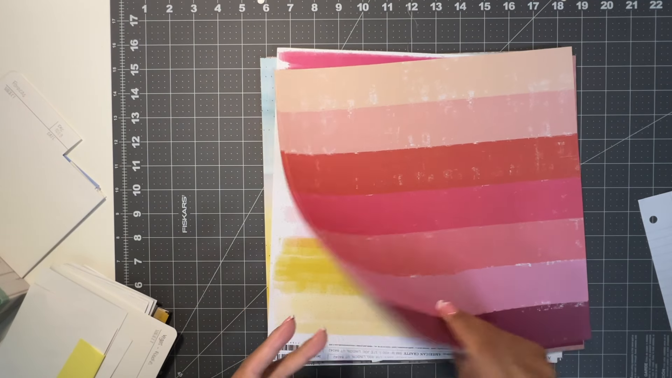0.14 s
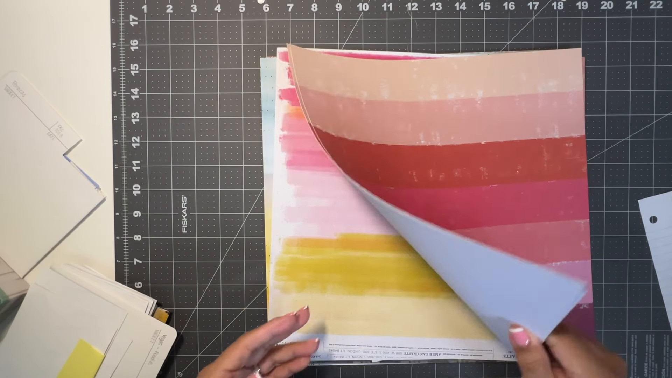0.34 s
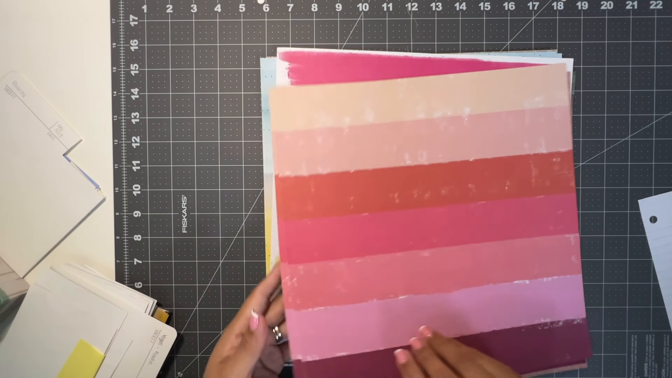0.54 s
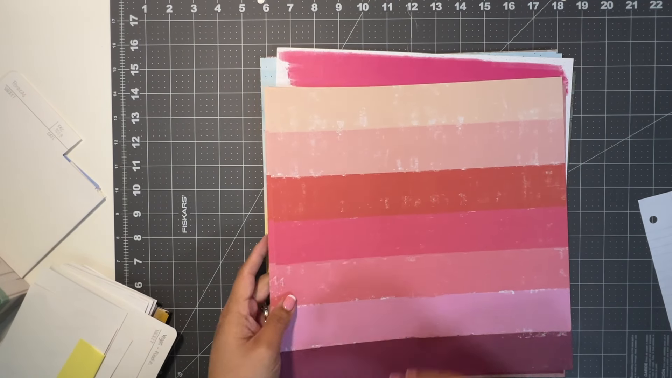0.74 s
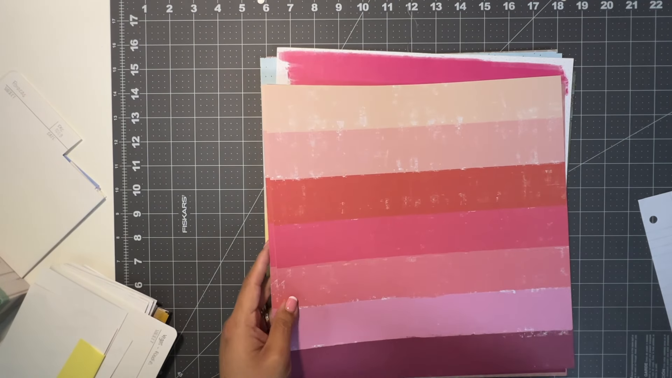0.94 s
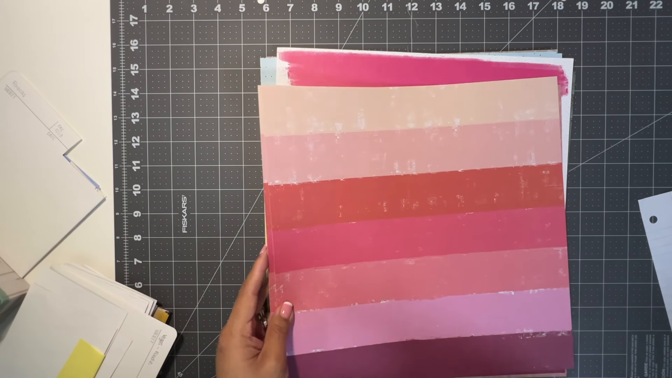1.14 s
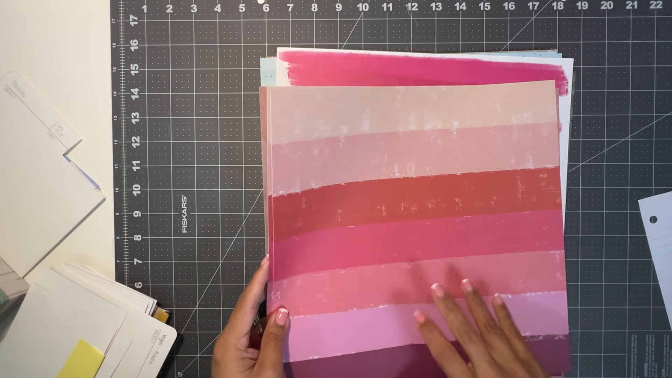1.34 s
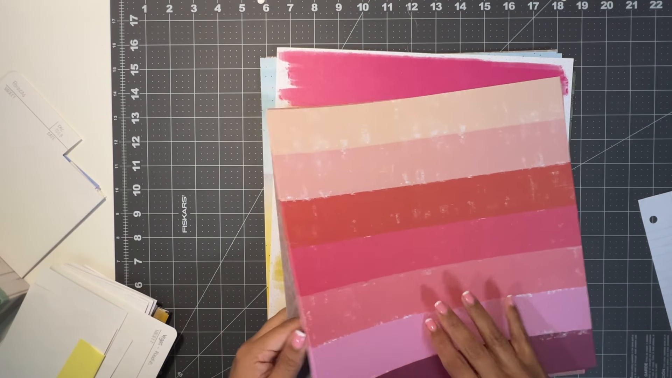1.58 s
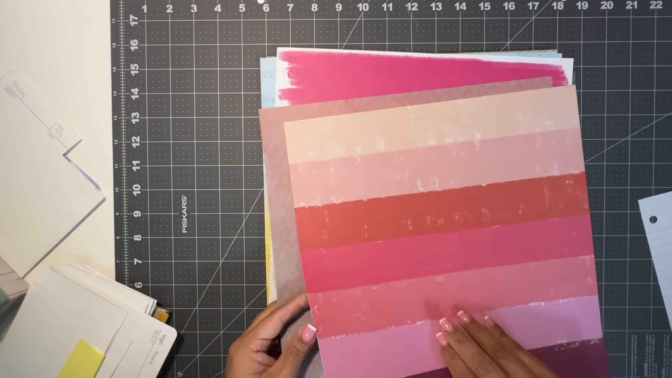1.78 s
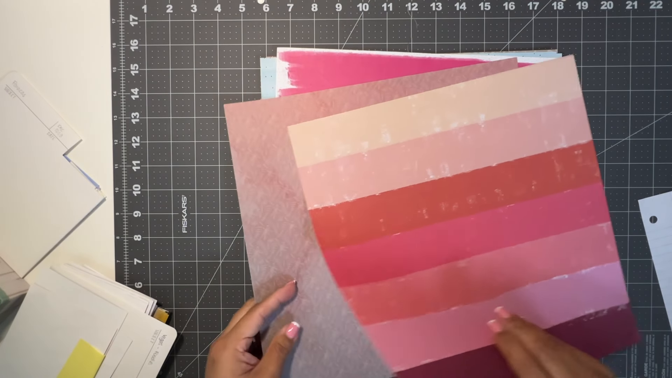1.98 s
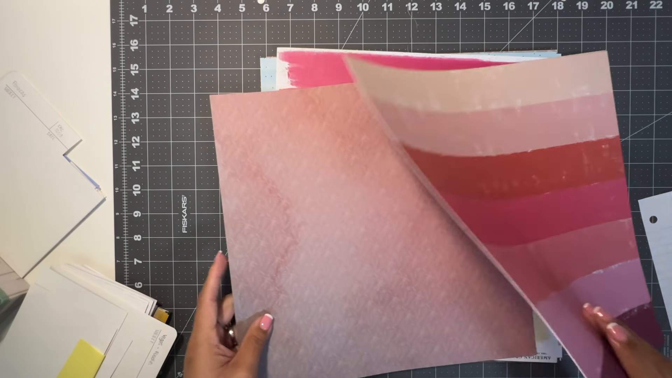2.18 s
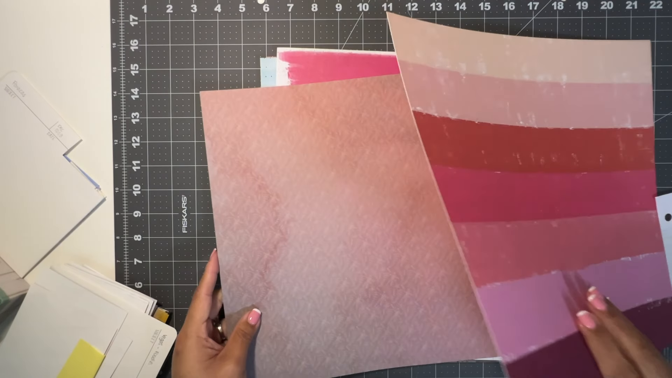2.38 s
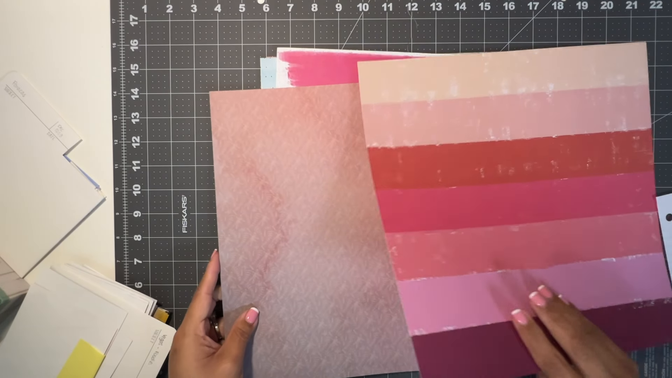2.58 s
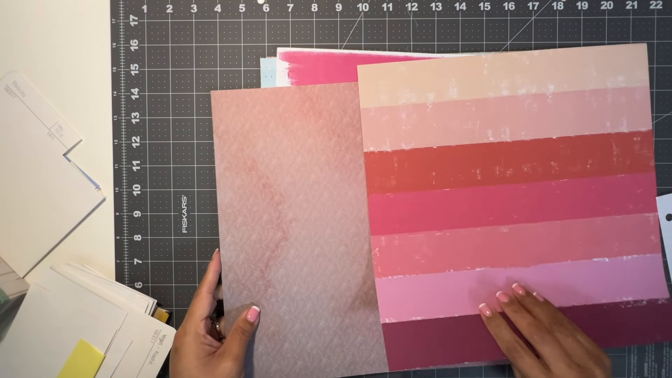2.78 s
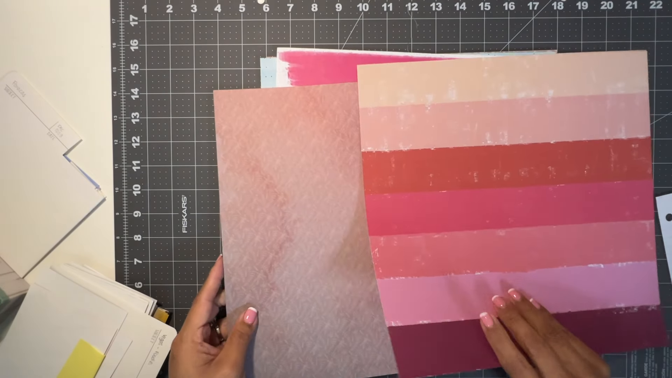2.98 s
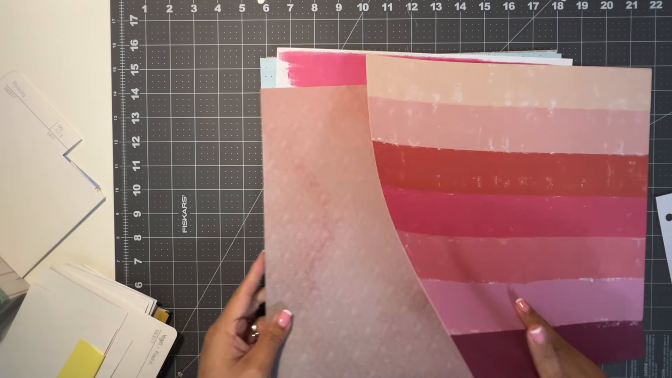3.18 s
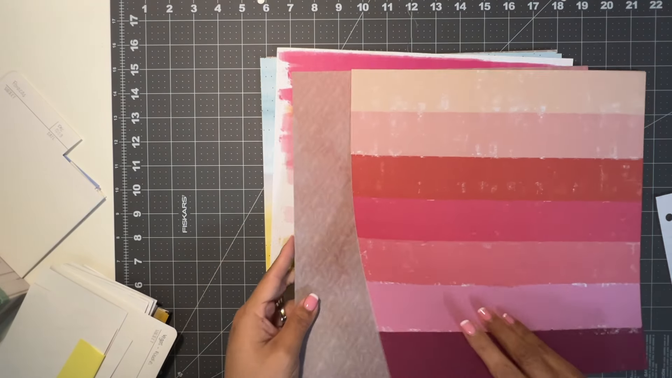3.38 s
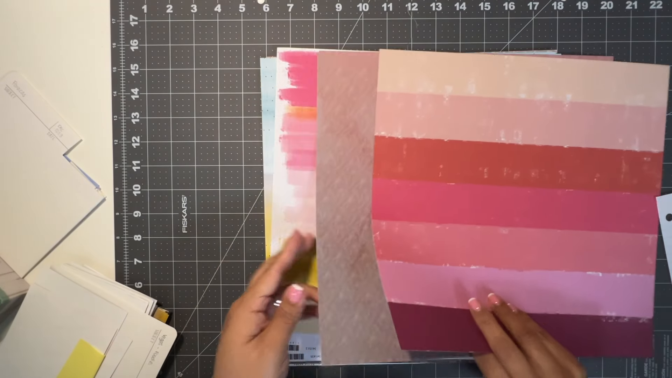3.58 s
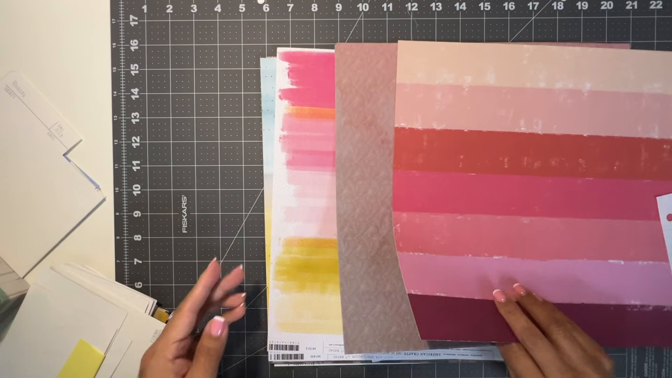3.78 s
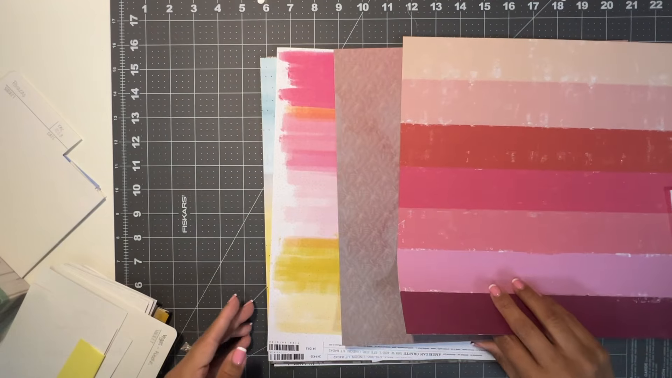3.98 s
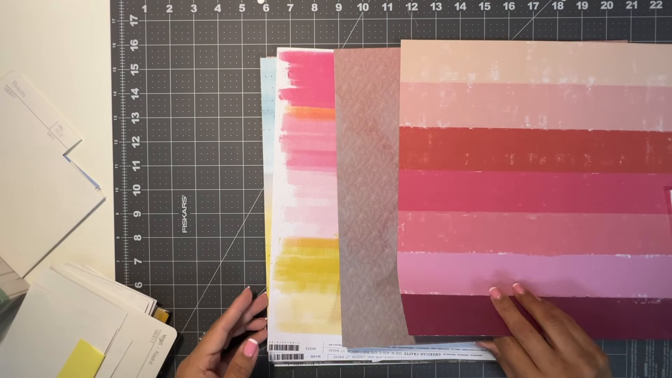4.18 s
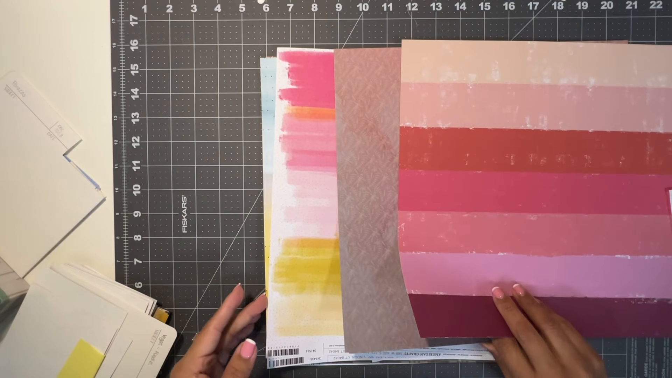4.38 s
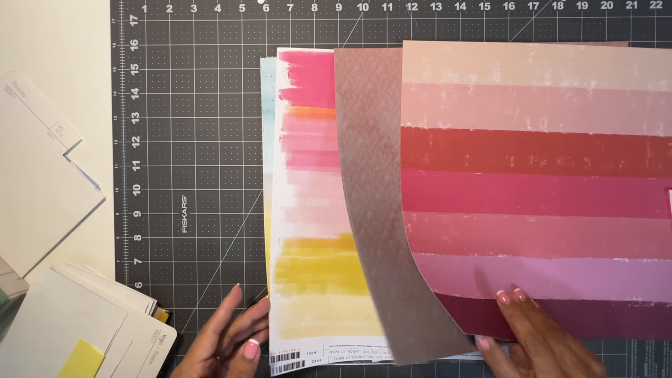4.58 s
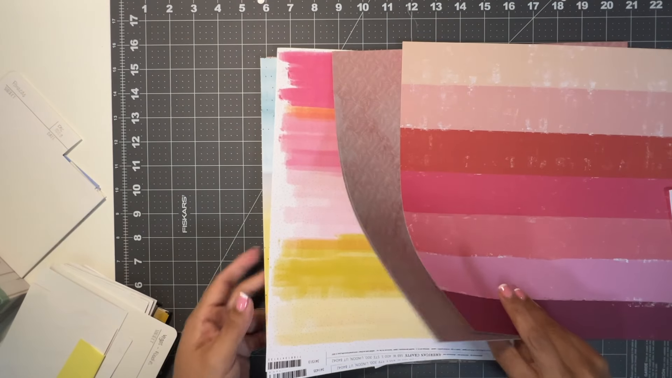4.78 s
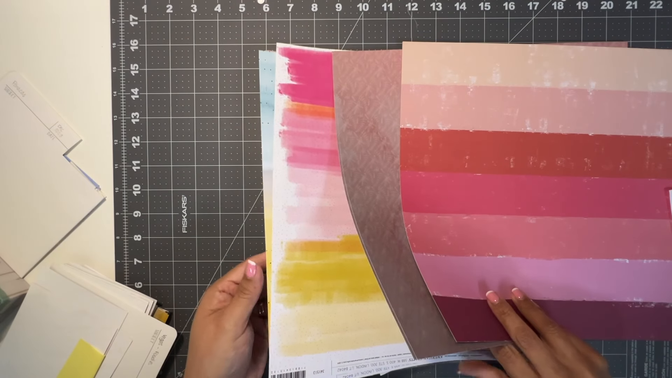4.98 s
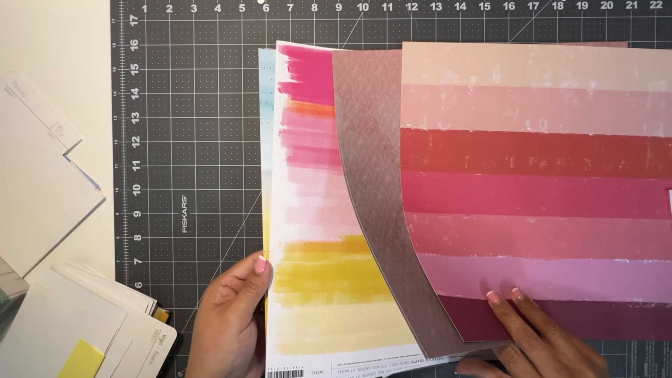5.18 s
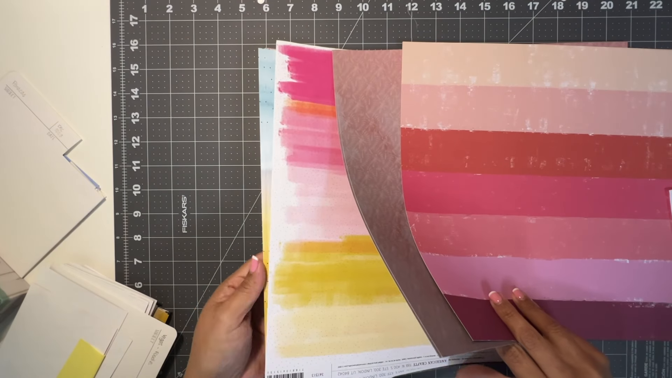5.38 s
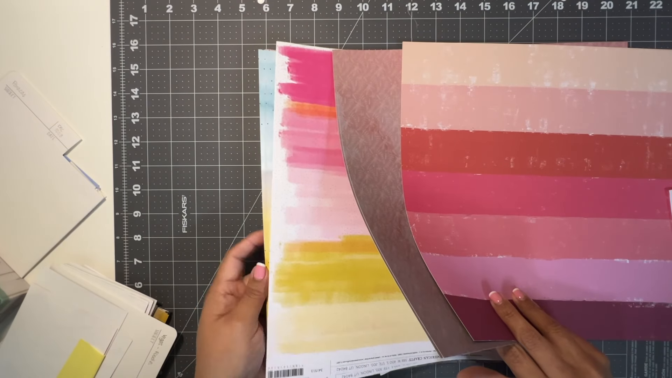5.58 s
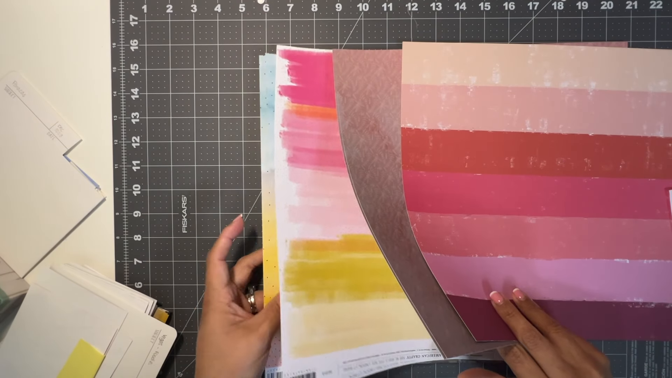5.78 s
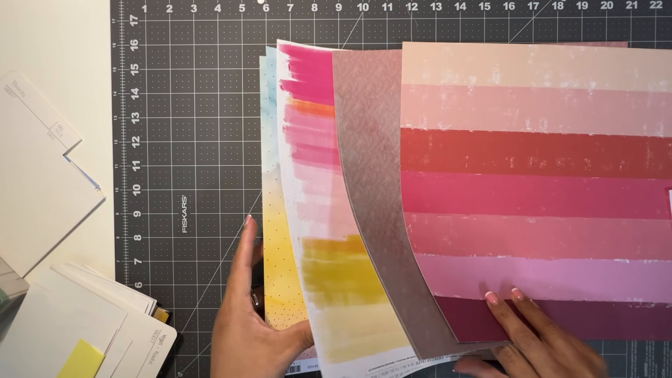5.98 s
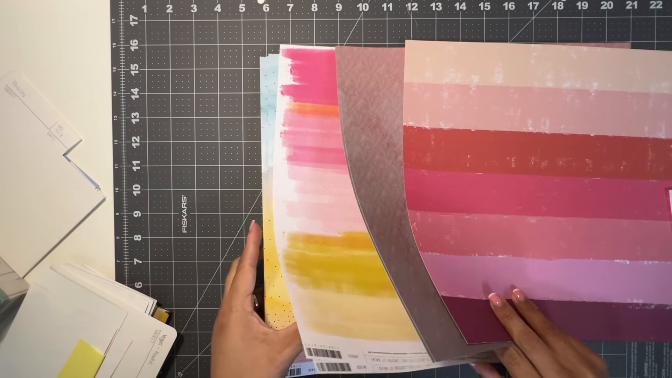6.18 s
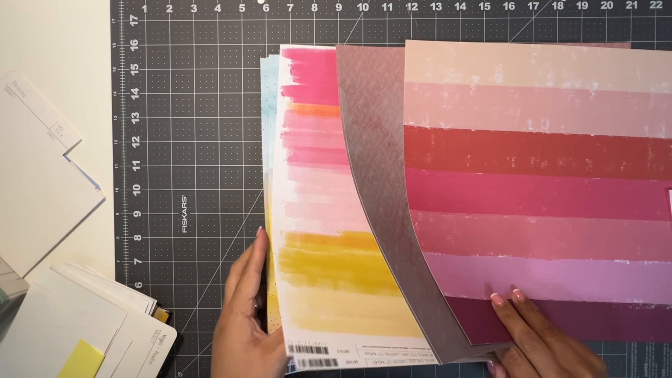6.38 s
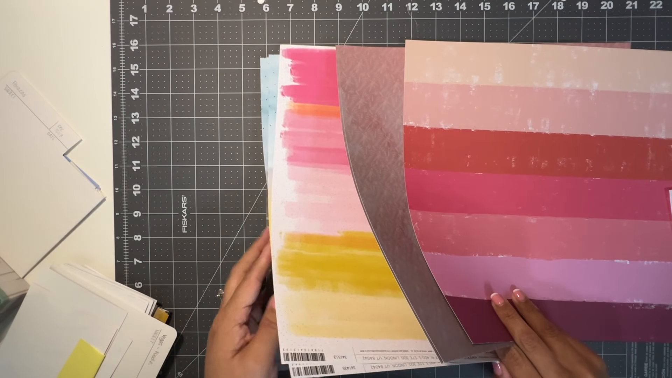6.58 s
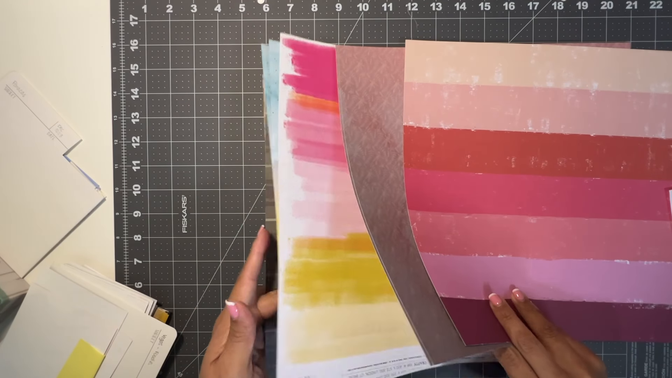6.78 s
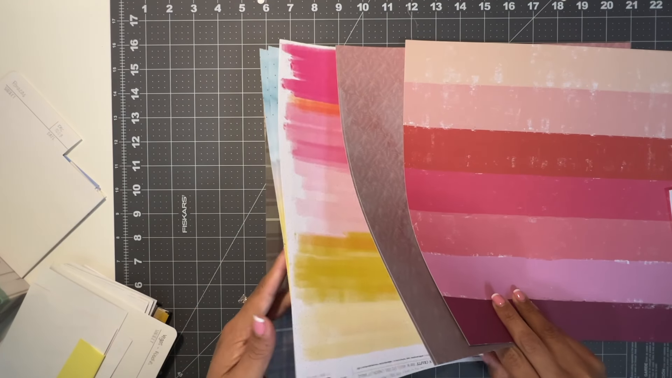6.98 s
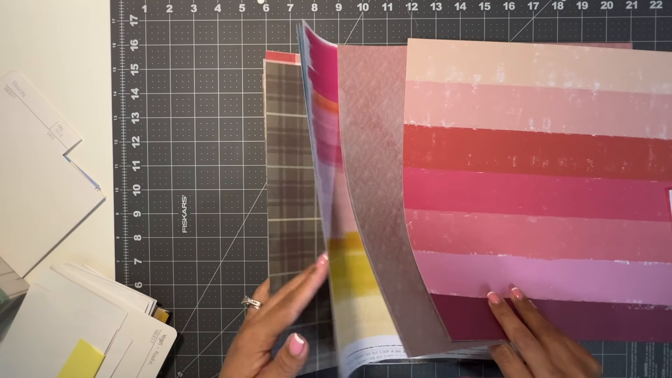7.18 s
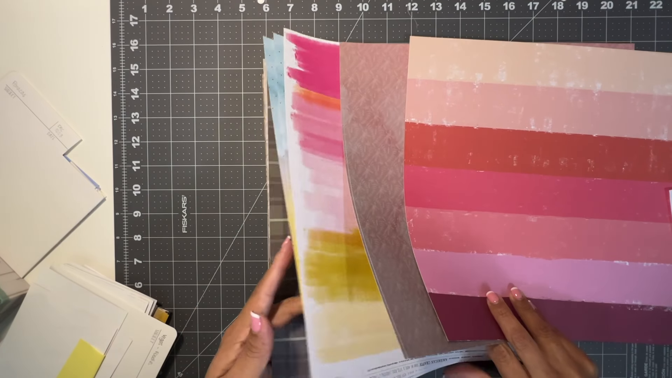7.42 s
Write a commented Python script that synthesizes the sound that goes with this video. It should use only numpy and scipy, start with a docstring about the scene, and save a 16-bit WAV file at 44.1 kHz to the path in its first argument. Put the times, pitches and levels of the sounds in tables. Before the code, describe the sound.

Close stereo pickup above a desk in a quiet room. Stiff sheets rustle, then one flexes with loud hollow pops and a dull thump around half a second. After a brief lull, sheets scrape and slide strongly over each other with more pops, then settle into intermittent, softer rustles, small ticks and light finger bumps as the stack is fanned.

```python
"""Hands flip and fan a stack of stiff paper on a desk mat in a quiet room, close stereo microphone above.
From the start filtered noise makes the hiss of faces, scrape of edges, rustle and pumped air, swelling with
each stroke, over a low desk rumble, room tone and a faint whine. From about half a second on, bent sheets
buckle with short ringing pops, fingers and the stack thump the desk top as dull falling tones, and dragged
edges sing as noise in a narrow moving resonance."""
import sys
import numpy as np
from scipy import signal
from scipy.fft import rfft, irfft
from scipy.io import wavfile
from scipy.ndimage import uniform_filter1d

SR = 44100
rng = np.random.default_rng(int(sys.argv[2]) if len(sys.argv) > 2 else 0)


def dump(signal):
    """Clip the signal to [-1, 1] and save it as 16-bit WAV at the path in sys.argv[1]."""
    limited = np.clip(np.atleast_2d(signal).T, -1, 1)
    pcm = np.round(limited * 32767).astype(np.int16)
    wavfile.write(sys.argv[1], SR, pcm)


N = 328545

# sheets buckling and edges flicking: t/s, ring level/dB, ring f/Hz, tick level/dB
BUCKLES = [(0.5586, -17.5, 720, -39), (0.5728, -11.5, 690, -40), (0.58, -22, 6200, -33),
           (0.59, -5, 5800, -28), (0.588, -13.5, 1530, -37), (0.725, -50, 6600, -33),
           (1.31, -36, 3930, -34), (1.376, -37.5, 710, -45), (1.559, -21, 840, -37),
           (1.618, -26, 2870, -36), (1.6185, -20, 820, -44), (1.6618, -22, 5500, -20),
           (1.724, -13, 834, -39), (1.7252, -20, 514, -38), (2.028, -23.5, 2580, -38),
           (2.2654, -23.5, 1170, -22), (2.2773, -14, 1000, -37), (2.2674, -25.5, 423, -50),
           (2.2889, -22.5, 437, -45), (2.304, -34, 554, -50), (2.526, -35.5, 8400, -26),
           (2.6464, -40.5, 1145, -62), (2.7653, -48.5, 900, -65.5), (3.061, -34, 1460, -36),
           (3.2967, -32.5, 460, -40), (3.3627, -29, 1240, -46), (3.365, -33, 430, -47),
           (3.5691, -24, 720, -37), (3.7929, -37.5, 716, -24), (4, -33, 1900, -42), (4.028, -33, 1830, -47),
           (4.1519, -33, 1900, -34), (4.6233, -27.5, 860, -42.5), (4.6406, -28, 2120, -26.5),
           (4.7986, -40, 1110, -29), (5.0179, -35.5, 325, -51), (5.1015, -53.5, 2070, -51.5),
           (5.1953, -50, 890, -68), (5.3686, -43.5, 1760, -61.5), (5.529, -40, 890, -53),
           (5.711, -30, 900, -22), (5.9132, -40, 1140, -55), (6.201, -30, 1690, -45),
           (6.376, -32.5, 800, -33), (6.431, -29, 1290, -22), (6.63, -33, 950, -39)]
# how far the left channel leads the right: f/Hz, phase/rad
LEFT_LEAD = [(150, 0), (340, .7), (690, 0), (4570, .1), (5340, -.9), (6200, -1.4), (8010, 0), (8700, -1.5),
             (16400, -1.7)]


def gain_of(db):
    """Decibels to an amplitude factor."""
    return 10 ** (np.asarray(db) / 20)


def evened(x):
    """Scales to rms 1."""
    return x / np.sqrt(np.mean(x ** 2) + 1e-20)


def read(points, hz):
    """Looks a curve up on a log frequency axis."""
    f, value = np.transpose(points)
    return np.interp(np.log(hz + 1), np.log(f + 1), value)


def add(mix, s, sound):
    """Mixes a stereo sound in at time s."""
    part = mix[:, round(s * SR):][:, :sound.shape[1]]
    part += sound[:, :part.shape[1]]


def noise(spectrum, patchy_db, size):
    """Stereo noise from random short-time spectra, in which narrow patches of pitch come and go."""
    # likeness of the two channels: f/Hz, correlation
    likeness = [(60, .86), (200, .85), (420, .72), (900, .8), (1700, .94), (2900, .7), (4000, .72),
                (5700, .55), (15000, .65)]
    # balance of the two channels: f/Hz, left-right level/dB
    balance = [(60, .7), (450, 4.5), (900, 3.5), (1500, 1), (3000, 1.3), (5000, -.5), (15000, -.3)]
    frames, hz = 2 * N // size + 5, np.fft.rfftfreq(size, 1 / SR)
    a, b, c, d, patches = rng.standard_normal((frames, len(hz), 5)).T
    patches = uniform_filter1d(patches, size=2, axis=0)
    patches = evened(uniform_filter1d(patches, size=10, axis=1))

    same = np.clip(read(likeness, hz), -1, 1)[:, None]
    left, other = a + 1j * b, c + 1j * d
    right = same * left + np.sqrt(1 - same ** 2) * other
    right = right * np.exp(-1j * read(LEFT_LEAD, hz))[:, None]

    spectra = np.array([left, right]) * gain_of(read(spectrum, hz)[:, None] + patchy_db * patches)
    spectra = spectra * gain_of(np.outer([.5, -.5], read(balance, hz)))[:, :, None]
    x = signal.istft(spectra, window="cosine", nperseg=size, noverlap=size // 2)[1][:, :N]
    return x / np.sqrt(np.mean(x.mean(0) ** 2))  # the mean of both channels gets rms 1


def slips(per_s, spread_db, hold_s):
    """Stick-slip jolts: sudden swells of random size that die away, over a steady drag."""
    sizes = gain_of(spread_db * np.minimum(rng.exponential(1, N), 3))
    jolts = sizes * (rng.random(N) < per_s / SR)
    keep = np.exp(-1 / (hold_s * SR))
    return evened(1 + signal.lfilter([1], [1, -keep], jolts))


def strokes():
    """Levels (dB) of hiss, scrape, rustle and air: every stroke swells and fades, and their powers add."""
    # movements of the hands over the paper: peak t/s, swell/s, fade/s,
    # face hiss level/dB, edge scrape level/dB, sheet rustle level/dB, air between sheets level/dB
    movements = [(0.052, 0.33, 0.14, -46, -42, -42.5, -46.5), (0.21, 0.072, 0.18, -51.5, -47.5, -43.5, -51),
                 (0.485, 0.23, 0.049, -80, -60, -48.5, -69), (0.607, 0.27, 0.15, -43.0, -43.5, -41.5, -42),
                 (0.817, 0.28, 0.17, -72.5, -61.5, -58.5, -63),
                 (1.061, 0.052, 0.16, -62, -59, -55.5, -63.5), (1.234, 0.12, 0.29, -62, -59, -52.5, -56),
                 (1.238, 0.032, 0.023, -51, -48.5, -54, -49.5), (1.335, 0.017, 0.013, -50.5, -70, -75, -80),
                 (1.405, 0.048, 0.28, -45.5, -46, -46, -42), (1.515, 0.041, 0.16, -60, -50, -46, -46.5),
                 (1.517, 0.02, 0.02, -47, -34.5, -35, -38), (1.6, 0.072, 0.091, -41.5, -32.5, -50, -42.5),
                 (1.819, 0.35, 0.27, -40.5, -36, -41, -39.5), (1.823, 0.019, 0.02, -59, -27, -29, -47),
                 (1.974, 0.3, 0.39, -42, -41, -40, -49), (2.26, 0.35, 0.034, -46, -55, -39.5, -50),
                 (2.342, 0.29, 0.16, -42, -43, -46, -43.5), (2.511, 0.076, 0.12, -58, -57, -50, -61),
                 (2.59, 0.1, 0.11, -77, -58.5, -49, -56.5), (2.711, 0.05, 0.086, -78, -61, -60, -73),
                 (2.88, 0.073, 0.28, -71, -54.5, -52, -68.5), (3.05, 0.13, 0.19, -48.5, -42, -40.5, -45.5),
                 (3.14, 0.24, 0.28, -42, -49.5, -41.5, -72), (3.258, 0.22, 0.51, -42.5, -44.5, -42, -71),
                 (3.42, 0.15, 0.064, -75, -45, -46, -42), (3.514, 0.12, 0.47, -47, -39.5, -49, -53),
                 (3.688, 0.057, 0.54, -49.5, -43, -54, -83), (3.885, 0.11, 0.029, -45.5, -38, -46, -53.5),
                 (4.071, 0.15, 0.11, -71, -52, -57.5, -57.5), (4.167, 0.09, 0.074, -69, -59.5, -61, -65),
                 (4.301, 0.13, 0.054, -67, -54, -61.5, -71),
                 (4.578, 0.21, 0.084, -44.5, -38.5, -47.0, -59.5), (4.623, 0.043, 0.16, -56, -51, -46, -49),
                 (4.812, 0.12, 0.088, -51, -57, -52, -61), (4.995, 0.16, 0.092, -76.5, -70, -59, -70),
                 (5.302, 0.3, 0.13, -74, -70.5, -60.5, -72), (5.415, 0.053, 0.059, -51, -49, -45.5, -52),
                 (5.48, 0.036, 0.034, -66, -60, -53.5, -53), (5.56, 0.08, 0.055, -53.5, -48, -49.5, -50),
                 (5.663, 0.1, 0.052, -47.5, -46.5, -43, -56), (5.715, 0.035, 0.1, -44.5, -49, -46.5, -52),
                 (5.738, 0.019, 0.018, -57, -45, -33, -46), (5.867, 0.089, 0.085, -70, -60, -49.5, -58),
                 (5.931, 0.041, 0.54, -59.5, -50.5, -44, -50.5), (5.985, 0.022, 0.018, -58, -50, -56, -47),
                 (6.123, 0.17, 0.15, -53, -44.5, -67, -75), (6.226, 0.12, 0.19, -50, -44.5, -40, -48),
                 (6.403, 0.15, 0.17, -53.5, -45.5, -44, -47.5), (6.549, 0.31, 0.19, -52, -54, -50.5, -57),
                 (6.633, 0.0087, 0.13, -51, -49.5, -42.5, -45),
                 (6.741, 0.14, 0.16, -48.5, -46.0, -42, -52.5),
                 (6.825, 0.053, 0.078, -60, -47.5, -44.5, -70),
                 (6.994, 0.13, 0.2, -54, -53.5, -50.5, -56.5), (7.157, 0.04, 0.62, -50.5, -47, -56, -79),
                 (7.263, 0.14, 0.071, -44, -45, -39.5, -59), (7.4, 0.23, 0.22, -58, -70, -46.5, -54.5)]
    rounding = 1.465  # 1 = pointed strokes, 2 = round ones
    # how far a stroke lies under its peak one swell before, one fade after: hiss, scrape, rustle, air
    depths_db = 29.5, 24.5, 24.5, 24.5
    s, swell, fade, *peaks = np.transpose(movements)[:, :, None]
    t = np.arange(0, N / SR + .01, .002)
    away = np.where(t < s, (s - t) / abs(swell), (t - s) / abs(fade)) ** rounding
    powers = [(gain_of(db - depth * away) ** 2).sum(0) for db, depth in zip(peaks, depths_db)]
    return [np.interp(np.arange(N) / SR, t, 10 * np.log10(p + 1e-10)) for p in powers]


def rubbing(hiss_db, scrape_db, rustle_db, air_db):
    """Five bands of friction noise, jolted together where the paper catches; buckles shake all but the hiss."""
    # colours of face hiss, its bright top, edge scrape, sheet rustle and pumped air: f/Hz, relative level/dB
    hiss = [(2000, -30.5), (4500, -3.5), (6000, -1.5), (8000, -7.5), (10500, -16), (14000, -29)]
    fizz = [(7000, -9.5), (10000, -4.5), (12500, -2), (16000, -6.5)]
    scrape = [(1800, -26), (2500, 0.5), (2950, 0.5), (3350, -2), (3700, -4), (4500, -12), (5200, -25)]
    rustle = [(600, -32), (950, -6.5), (1300, -7), (1600, -6.5), (2100, -8.5), (2800, -36)]
    flutter = [(200, -15), (300, 0), (520, 0.5), (800, 6), (1100, -35.5)]

    kicks = np.zeros(N)
    kicks[np.round(np.transpose(BUCKLES)[0] * SR).astype(int)] = 0.22
    # a buckle shakes the sheets loose, dying away over 11 ms
    shaken = 1 + signal.lfilter([1], [1, -np.exp(-1 / (0.011 * SR))], kicks)
    catch = slips(per_s=40, spread_db=2.5, hold_s=.007)
    crackle = slips(per_s=300, spread_db=5.5, hold_s=.0008) ** .3  # fibres snap in fast tiny ticks
    fizz_db = -54.5 + 2.1 * (hiss_db + 48.0)  # a louder hiss is brighter

    # level, noise, how strongly the catches jolt it
    layers = [(hiss_db, noise(hiss, patchy_db=2.5, size=256), .2),
              (fizz_db, noise(fizz, patchy_db=2.5, size=256), .2),
              (scrape_db, shaken * crackle * noise(scrape, patchy_db=4.0, size=512), .35),
              (rustle_db, shaken * crackle * noise(rustle, patchy_db=3.0, size=512), .4),
              (air_db, shaken * noise(flutter, patchy_db=2.2, size=512), .5)]
    return sum(gain_of(db) * x * evened(catch ** jolt) for db, x, jolt in layers)


def room():
    """Quiet room tone as patchy noise, and a faint steady whine as a sine."""
    # colour of the room: f/Hz, relative level/dB
    room_tone = [(18, -38.5), (30, 3), (225, -8.5), (622, -41), (1200, -20), (5170, -30.5), (8060, -29),
                 (13600, -56), (15500, -70.5)]
    room_db, whine_db, whine_hz = -63, -91, 8183
    whine = np.sqrt(2) * gain_of(whine_db) * np.sin(2 * np.pi * whine_hz * np.arange(N) / SR)
    return gain_of(room_db) * noise(room_tone, patchy_db=6.0, size=1024) + whine


def desk(air_db):
    """Low rumble under the moving hands, and dull rough rings where fingers and the stack land."""
    # colour of the desk top: f/Hz, relative level/dB
    desk_colour = [(22, -39.5), (45, -29), (65, -8.5), (110, -13.5), (200, -20), (350, -51)]
    # blows on the desk top: t/s, level/dB, f/Hz where the pitch settles
    blows = [(0.569, -28.5, 67.5), (0.645, -29, 114.3), (1.39, -30.5, 69), (1.631, -33.5, 81),
             (1.725, -31, 107), (1.863, -31, 73), (1.997, -47, 117.6), (2.258, -41, 195),
             (3.063, -42.5, 133), (3.299, -38, 82), (3.865, -39, 85), (4.004, -59.5, 87.5),
             (4.032, -40, 76), (4.114, -45, 147.5), (4.154, -38, 86.3), (4.629, -44, 72.6),
             (4.801, -43, 105.7), (5.468, -45.5, 150), (5.713, -42, 148), (6.372, -39, 103.5),
             (6.632, -37.5, 149), (7.206, -45, 64)]
    shake_db = -64.5 + 0.24 * (air_db + 61.5)  # busier hands shake it more
    rumble = noise(desk_colour, patchy_db=0.0, size=2048)
    out, t = gain_of(shake_db) * rumble, np.arange(8000) / SR
    for s, db, hz in blows:
        # the board's many other modes join the strongest one as a rough rumble
        rough = rumble[:, round(s * SR / 2):][:, :len(t)]
        fade = gain_of(db - 60 * t / .2) * (1 - np.exp(-(t / 0.0075) ** 2))
        # the quicker bending waves arrive first: the pitch falls
        turns = hz * (t + 0.8 * 0.02 * (1 - np.exp(-t / 0.02)))
        add(out, s, fade * (0.61 * np.sin(2 * np.pi * turns) + 0.6 * rough))
    return out


def pops():
    """Each buckle swells and rings a few cycles, with an overtone, a wide tick, a low push and a scattered tail."""
    # place of a pop by its pitch: f/Hz, left-right level/dB
    pop_balance = [(300, 8.5), (900, 4), (1800, 0.5), (5500, 1.5)]
    out, t = np.zeros((2, N)), np.arange(3000) / SR
    rise = np.clip(t / .0014, 0, 1) ** 2
    for (s, db, hz, tick_db), phase in zip(BUCKLES, rng.random(len(BUCKLES))):
        cycles = t * hz
        fade = np.clip(cycles / 1.2, 0, 1) ** 2 * gain_of(-60 * cycles / (9 + 0.0023 * hz))
        overtone = 0.11 * np.sin(2 * np.pi * (1.616 * cycles + phase))
        ring = fade * (np.sin(2 * np.pi * cycles) + overtone)

        # broad noise with one sharp click, strongest at a few kHz
        click = 14.0 * (np.arange(len(t)) == 30)
        grit = signal.lfilter([1, -1], [1, -1.2, .4], rng.standard_normal(len(t)) + click)
        tick = grit * rise * (np.exp(-t / 0.00072) + 0.059 * np.exp(-t / 0.0063))
        push = 0.28 * rise * np.sin(2 * np.pi * 380 * t) * np.exp(-t / 0.0046)

        # the crease runs along the sheet: weaker random rings follow, shorter at high pitch
        keep = np.exp(-np.pi * hz * .7 / SR)
        band = [1, -2 * keep * np.cos(2 * np.pi * hz / SR), keep ** 2]
        tail = evened(signal.lfilter([1, -1], band, rng.standard_normal((2, len(t)))))
        tail = gain_of(-11 - 60 * t * np.sqrt(hz) / 2.6) * tail * rise

        pop = gain_of(db) * (ring / abs(ring).max() + push + tail)
        pop = pop + gain_of(tick_db) * tick / abs(tick).max()
        add(out, s, gain_of(np.array([[.5], [-.5]]) * read(pop_balance, hz)) * pop)
    # the right channel lags as it does for the rubbing
    lag = np.exp(-1j * read(LEFT_LEAD, np.fft.rfftfreq(N, 1 / SR)))
    return np.array([out[0], irfft(rfft(out[1]) * lag, N)])


def drags():
    """Friction noise through one narrow resonance that follows the free length of the edge."""
    # singing edges, one list of rows a drag: t/s, level/dB, f/Hz
    sung_edges = [
        [(0.62, -49, 1710), (0.864, -60.5, 1586), (0.92, -83, 1550)],
        [(1.1, -70, 1660), (1.25, -53, 1560), (1.32, -51.5, 1520), (1.38, -67, 1430)],
        [(1.385, -43.5, 3020), (1.47, -52.5, 2770)],
        [(1.735, -36.5, 2750), (1.825, -36.5, 2800)],
        [(3.385, -49, 640), (3.45, -37, 767)],
        [(3.465, -43, 2750), (3.9, -51, 3300)],
        [(4.03, -70.5, 3020), (4.14, -51, 3200)],
        [(6.01, -46, 2000), (6.09, -50, 2800), (6.19, -58, 4100)],
        [(6.165, -41, 2133), (6.28, -45, 1480)],
        [(6.24, -40, 924), (6.41, -61, 990)],
    ]
    out = np.zeros((2, N))
    # three noises into left and right: one shared, one for each side alone
    spread = [[1, 0.78], [0.2, 0], [0, 0.035]]
    for rows in sung_edges:
        s, db, hz = np.transpose(rows)
        t = np.arange(s[0], s[-1], 1 / SR)
        turn = np.exp(2j * np.pi * np.cumsum(np.interp(t, s, hz)) / SR)
        keep = np.exp(-np.pi * 0.09 * hz.mean() / SR)
        friction = (rng.standard_normal((len(t), 3)) @ spread).T
        # shift the moving pitch down to zero, smooth there, shift back up
        slow = signal.lfilter([1], [1, -2 * keep, keep ** 2], friction / turn)
        sung = evened((turn * slow).real) * gain_of(np.interp(t, s, db))
        add(out, s[0], sung * signal.windows.tukey(len(t), .4))
    return out


def scene():
    """Paper, room and desk together."""
    hiss_db, scrape_db, rustle_db, air_db = strokes()
    paper = rubbing(hiss_db, scrape_db, rustle_db, air_db) + pops() + drags()
    return paper + room() + desk(air_db)


def record(dry):
    """The microphone drops the deepest bass; then a steep low-pass: nothing sounds above about 15.9 kHz."""
    lean = signal.sosfilt(signal.butter(4, 40, "high", fs=SR, output="sos"), dry)
    edge_hz = 15900
    low_pass = signal.firwin(511, edge_hz, window=("kaiser", 9), fs=SR)
    return signal.oaconvolve(lean, low_pass[None], "same")


dry = scene()
out = record(dry)
dump(out)
```